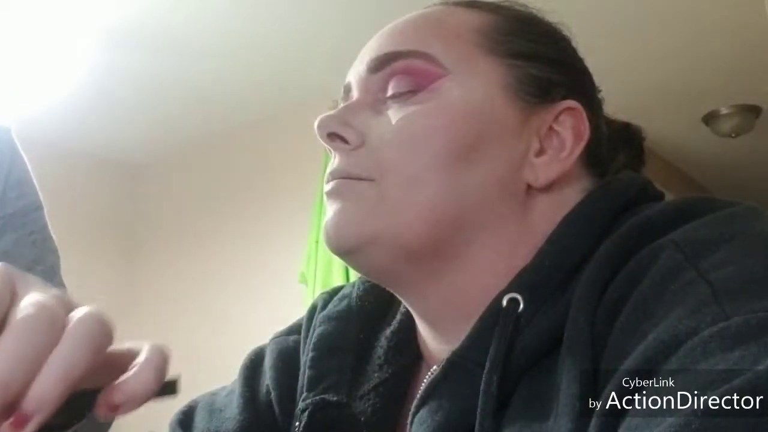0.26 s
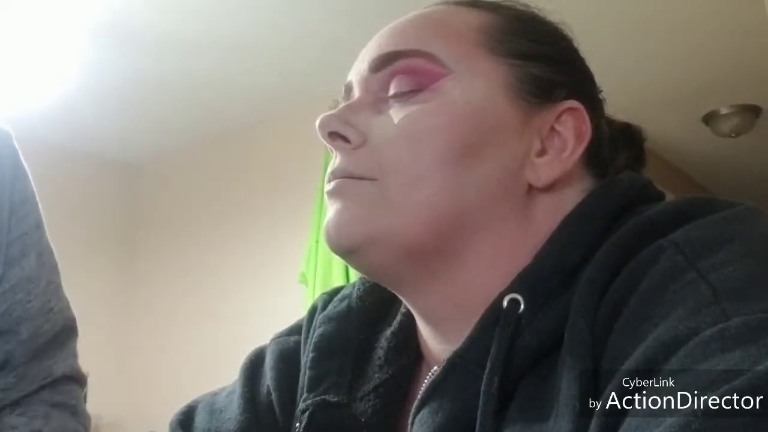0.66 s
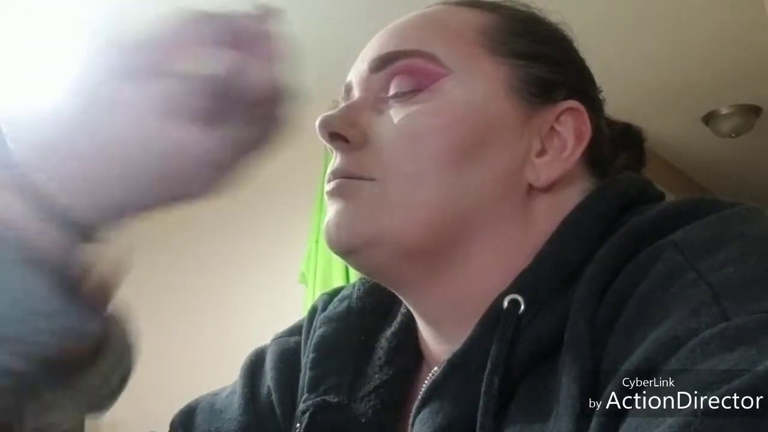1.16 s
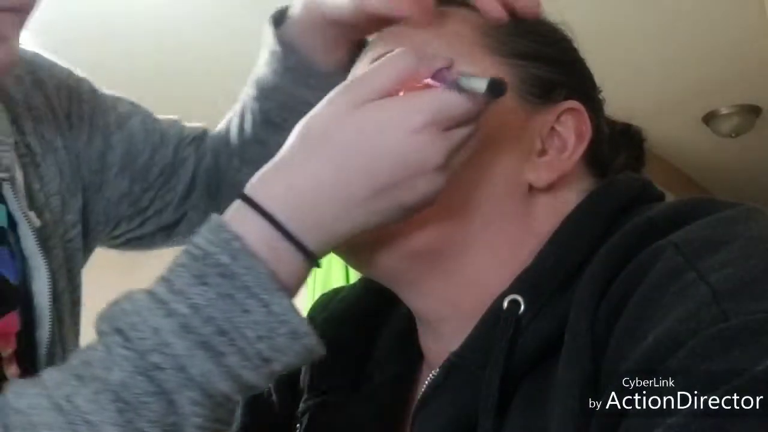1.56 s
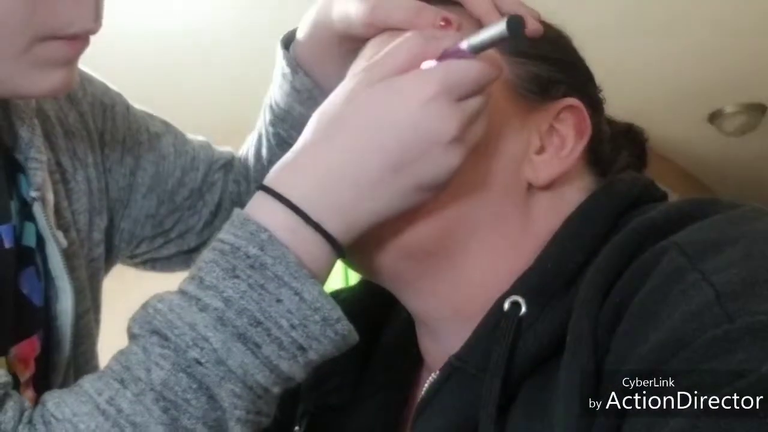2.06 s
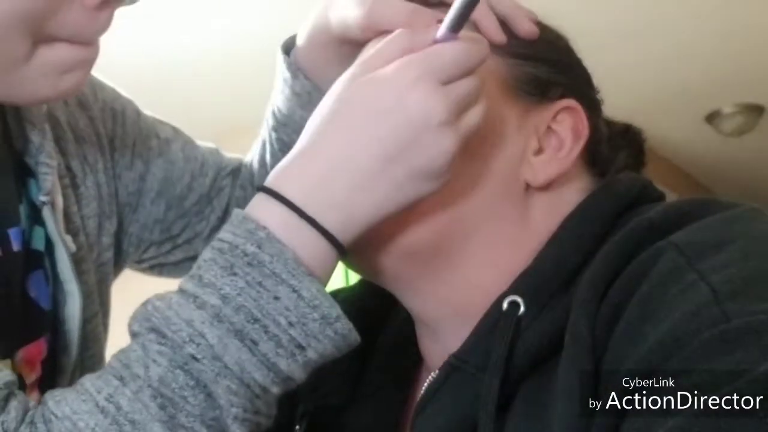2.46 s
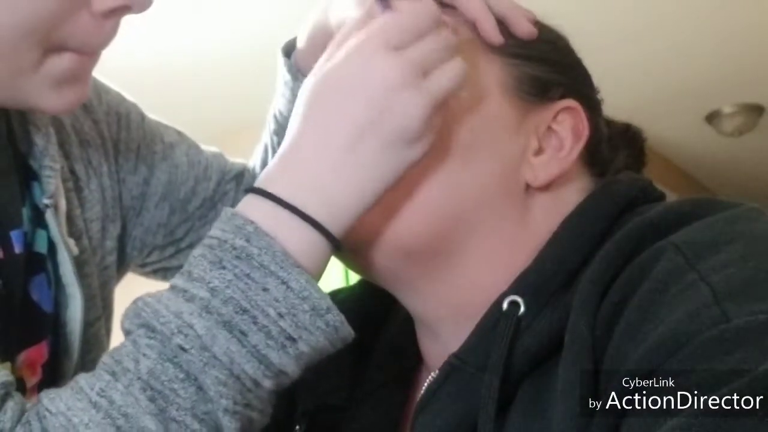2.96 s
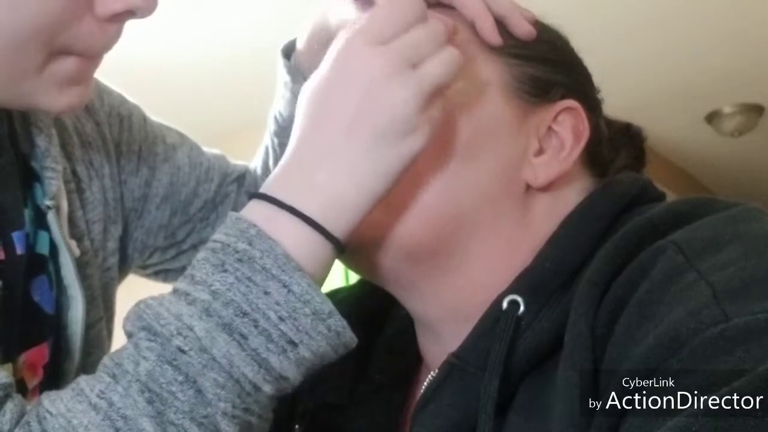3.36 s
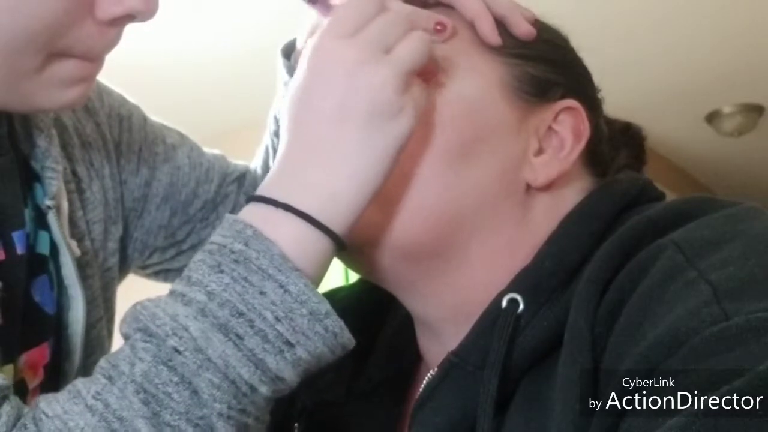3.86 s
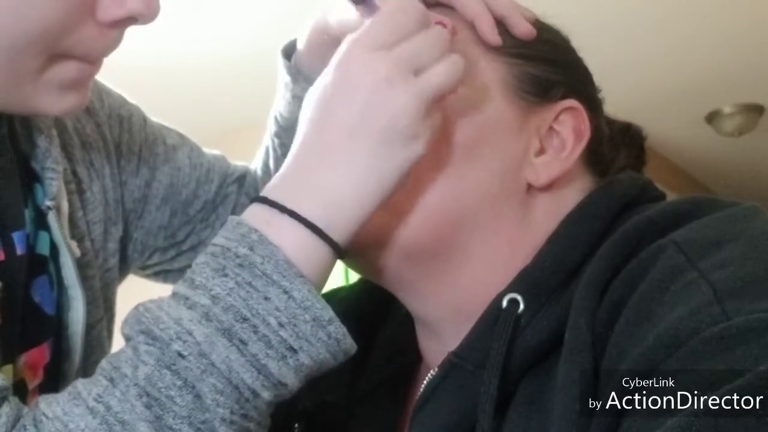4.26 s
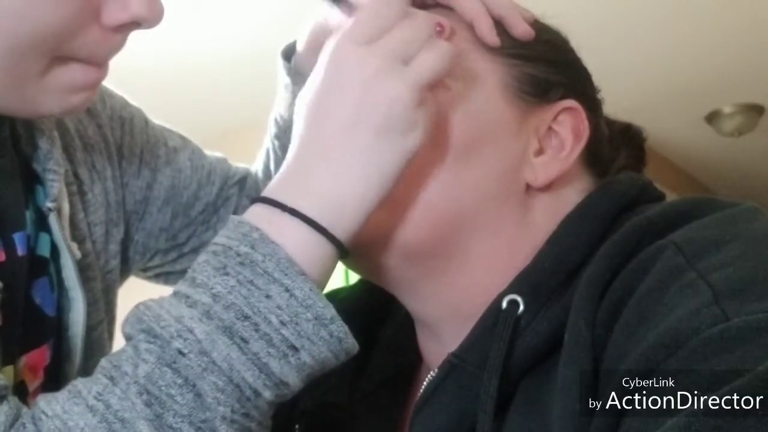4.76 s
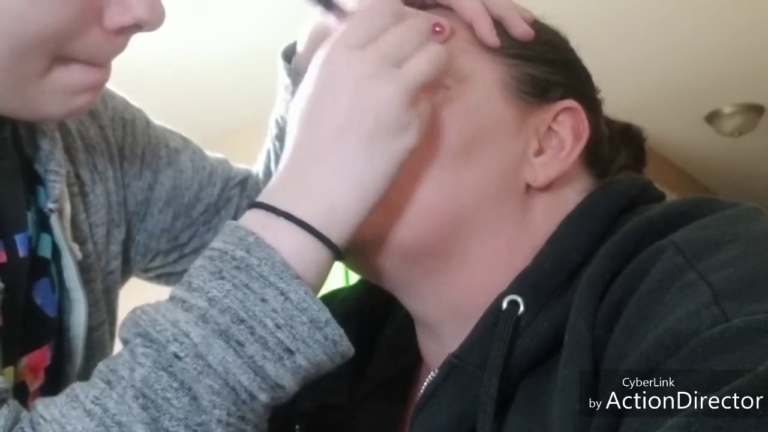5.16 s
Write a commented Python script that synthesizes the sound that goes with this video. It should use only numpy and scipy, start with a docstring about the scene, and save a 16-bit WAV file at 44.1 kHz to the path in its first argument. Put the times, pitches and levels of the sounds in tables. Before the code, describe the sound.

A dog laps water from a bowl across an echoing room, wet and quick, while a small plastic case clicks sharply close by.

```python
"""Echoing room in a house: a dog laps from its bowl across the room, about three laps a second.
Tongue smacks are cracks, hiss and droplets of filtered noise; splashes are swarms of rising sines in spray;
trapped air gulps as an unsteady sine with a gush of noise; tiny bubbles tick as falling sines.
Near the right port of a phone a small plastic case clicks on a table: noise and a blow through resonances.
The house adds hum tones, rumble and steady hiss."""
import sys
import numpy as np
from scipy import signal
from scipy.fft import rfft, irfft, next_fast_len
from scipy.io import wavfile
from scipy.ndimage import uniform_filter1d, map_coordinates

SR = 44100
rng = np.random.default_rng(int(sys.argv[2]) if len(sys.argv) > 2 else 0)


def transcribe(signal):
    """Save signal, clipped to [-1, 1], as a 16-bit WAV file at the path in sys.argv[1]."""
    frames = np.atleast_2d(signal).T
    limited = np.clip(frames, -1, 1)
    pcm = np.round(limited * 32767).astype(np.int16)
    wavfile.write(sys.argv[1], SR, pcm)


N = 238472

# tongue on water: t/s, level/dB, top treble/dB, lower resonance/dB, swell/s
TONGUE_SMACKS = [ (0.010, -40.5, 2.5, -0.5, 0.0036), (0.326, -29, 1.5, -7, 0.007),
                 (0.82, -29, -4, -16, 0.0038), (1.128, -37, 0, -8, 0.048), (1.226, -38, 1.5, 4, 0.0084),
                 (1.576, -40.5, -3, -1, 0.014), (1.600, -37.5, 0, -2, 0.0061), (1.818, -52, 9, 5, 0.0047),
                 (1.921, -42, 0, 3, 0.0079), (1.941, -36.5, 6.5, -12, 0.0091),
                 (2.021, -43.5, -23, -5, 0.0088), (2.329, -45.5, -1, 0, 0.0073), (2.366, -43, 4, 0, 0.0088),
                 (2.393, -36, 0.5, 0, 0.0056), (2.734, -43.5, 8.5, 3, 0.013), (3.172, -43, 7, -8, 0.0088),
                 (3.194, -36, 5.5, -3, 0.0043), (3.257, -51, 0, 6, 0.0098), (3.506, -48, 7, -8, 0.0069),
                 (3.53, -34.5, 5, -10, 0.0054), (3.619, -39.5, 1.5, 1.5, 0.0075),
                 (3.931, -49, -12, -8, 0.0059), (3.956, -42, -3, -19, 0.01), (3.977, -37, 9, 0, .012),
                 (4.306, -39.5, -1, -18, 0.0058), (4.333, -34.5, 8.5, -6, 0.0083), (4.4, -46, 9, -6, .008),
                 (4.778, -38, -4, -14, 0.0063), (4.805, -44, 8.5, 5, 0.0069), (4.886, -47, 10.5, 0, 0.0069),
                 (5.153, -33.5, 6, -3.5, 0.0089)]
# tiny bubbles bursting: t/s, level/dB, f/Hz, t60/s
BUBBLE_TICKS = [ (0.327, -39, 6700, 0.015), (0.823, -37.5, 6740, 0.016), (1.152, -47, 6770, .025),
                (1.229, -43, 6320, 0.032), (1.588, -40.5, 5000, .008), (2.023, -42, 6650, 0.033),
                (2.375, -36, 4630, 0.0097), (2.434, -38, 5240, 0.0099), (2.489, -21.5, 5130, 0.0029),
                (2.737, -43, 4930, 0.0056), (3.199, -35, 4690, 0.012), (3.53, -33.5, 6380, 0.026),
                (3.9345, -43.5, 4820, 0.015), (3.9936, -41, 5140, .008), (4.3415, -35, 6280, .01),
                (4.346, -38, 4730, .007), (4.335, -42, 10200, .008), (5.17, -42, 4170, .01),
                (5.154, -46, 10100, .008), (5.164, -43, 13500, .008), (4.784, -40.5, 6070, 0.024),
                (4.815, -46, 4620, 0.023), (5.16, -40, 4460, .01), (1.649, -44, 3660, .01),
                (1.662, -56, 2420, 0.0091), (0.0225, -42, 10100, .012), (0.334, -39, 10300, 0.013),
                (1.166, -44, 9500, .015), (1.6125, -49, 10100, .01), (1.946, -46, 10200, .01),
                (2.47, -46, 10300, 0.013), (2.748, -51, 10600, .01), (3.196, -37, 9700, 0.012),
                (3.196, -39, 6660, 0.011), (3.2005, -43, 10000, .008), (3.2635, -37.5, 9900, 0.025),
                (3.269, -41, 6540, 0.018), (3.609, -41, 10340, 0.015), (3.626, -35, 10100, 0.013),
                (3.96, -46, 6500, 0.017), (3.981, -47, 10100, 0.0087), (3.9935, -45, 10400, .008),
                (4.3415, -34, 12300, 0.0077), (4.8175, -40, 10000, 0.029), (5.163, -48, 9650, 0.0091)]
# bubble swarms: t/s, energy/dB, bubble f/Hz, pitch spread/octaves, spray/dB, length/s
BUBBLE_SPLASHES = [ (0.084, -24.5, 2080, 0.21, -14, .022), (0.43, -30, 3500, 0.37, -2, 0.019),
                   (1.156, -29.5, 2100, 0.1, 2.5, .018), (1.263, -25, 1560, 0.45, -11.5, 0.039),
                   (1.640, -29.5, 1810, 0.37, -5, 0.015), (1.691, -20.5, 1930, 0.25, -11.5, 0.022),
                   (1.987, -29, 1890, 0.14, -9, 0.019), (1.994, -37.5, 2920, 0.062, -19, .018),
                   (2.044, -31.5, 2500, .08, 1, 0.015), (2.483, -15.5, 4175, 0.087, -11, 0.014),
                   (2.807, -26.5, 4260, 0.53, -12, .025), (2.834, -31, 1390, 0.12, -17, 0.015),
                   (3.031, -38, 2460, 0.072, -24, 0.019), (3.272, -24.5, 4300, 0.29, -11, .02),
                   (3.277, -23.5, 1855, 0.26, -16, 0.031), (3.552, -31.5, 1330, 0.23, -16, 0.021),
                   (3.603, -25.5, 1980, 0.52, -11, 0.023), (3.626, -28, 1840, 0.37, -11, 0.017),
                   (3.828, -41.5, 2330, 0.12, -29, 0.012), (3.860, -38.5, 3510, 0.029, -23, 0.017),
                   (3.982, -35, 3260, 0.24, -14, 0.025), (4.072, -21.5, 4300, 0.24, -10.5, 0.014),
                   (4.42, -27, 2200, 0.5, -18, 0.03), (4.898, -21.5, 2060, 0.28, -21, .03),
                   (4.9, -30.5, 3600, 0.22, -23, .02), (5.194, -35, 3100, 0.052, -23, 0.017),
                   (5.249, -23.5, 2070, 0.35, -13, .03)]
# droplet spray spectrum: f/Hz, level per Hz/dB
SPRAY_COLOUR = [(300, 15), (1000, 9.5), (2000, 7.5), (4000, 9), (7000, 7.5), (12000, -2)]
# trapped air pockets: t/s, energy/dB, starting f/Hz
AIR_PLOPS = [ (0.0, -24.5, 705), (0.043, -22.5, 797), (0.384, -27.5, 743), (0.412, -27, 697),
             (0.848, -14, 827), (1.174, -24, 671), (1.201, -18, 729), (1.633, -22, 820),
             (1.706, -27.5, 958), (1.844, -31.5, 710), (1.898, -25.5, 970), (1.944, -27, 1130),
             (1.962, -26, 976), (1.995, -22, 720), (2.047, -27.5, 976), (2.329, -24.5, 846),
             (2.431, -17.5, 734), (2.488, -30, 975), (2.678, -30.5, 838), (2.752, -23.5, 768),
             (2.811, -28, 889), (2.833, -31, 1126), (3.297, -31.5, 1084), (3.552, -23, 795),
             (4.02, -21.5, 724), (4.055, -31, 790), (4.347, -32, 843), (4.362, -29.5, 692),
             (4.853, -26.5, 690), (5.185, -24.5, 654), (5.249, -30, 544)]
# bowl resonances: f/Hz, width/Hz, level/dB
BOWL_MODES = [(720, 31, 9), (846, 18, 8), (967, 12, 6), (1094, 5.1, 15)]
# case on table: t/s, energy/dB, table thump level/dB, top treble/dB, contact length/s,
# favoured ring f/Hz, its width/Hz, its level/dB, modes under 1.7 kHz/dB
CASE_CLICKS = [ (0.3462, -6, -47, 12.5, 0.0021, 12300, 2500, -4, -7),
               (0.6323, 7, -22, -9, 0.0033, 2580, 450, 1, 2),
               (0.7649, -3.5, -26, -19, 0.005, 2100, 350, 10, -8.5),
               (0.7718, -17, -52, -14, 0.0024, 4700, 400, 11, 0),
               (0.813, -23, -40.5, -9, 0.005, 2000, 200, -2, -1),
               (0.8849, -3.5, -59, 5, 0.004, 4450, 350, 3, -13.5),
               (0.8883, -6, -52, 1, 0.004, 4700, 400, 7, -1),
               (0.8922, -6.5, -33, -1, 0.006, 1310, 150, 6, -3)]
# plastic case resonances: f/Hz, width/Hz, level/dB
CASE_MODES = [(560, 55, 6), (820, 160, 9.5), (1337, 160, 13.5), (1610, 110, 9), (2200, 220, 9),
              (2690, 300, 2.5), (3800, 260, 2.5), (4450, 430, 7.5), (5140, 300, 11), (6500, 980, -5)]
# what the case sends to the walls over what it sends to the phone: f/Hz, level/dB
CASE_WALLWARD = [(300, 15), (600, 8), (1300, 1), (2000, -1), (2700, 3.5), (4400, -3), (5500, -4.5),
                 (6500, 3), (10000, -0.5)]
# table top modes: f/Hz, level/dB, t60/s
TABLE_MODES = [(177, 9, 0.041), (349, -4, 0.038), (460, 4, 0.021)]
# reverberation: f/Hz, t60/s
ROOM_T60 = [(300, 0.34), (1000, 0.37), (4000, 0.46), (10000, 0.36), (15000, 0.28)]
# left-right likeness of diffuse sound: f/Hz, correlation/1
PORT_LIKENESS = [(60, 0.98), (130, 0.95), (290, 0.82), (640, 0.14), (1400, 0.064), (15000, 0.0095)]
# background noise spectrum, relative: f/Hz, level per Hz/dB
AIR_COLOUR = [(25, 3), (55, 2), (76, 3), (100, -8.5), (150, -3.5), (200, -4), (260, -10.5), (404, -15),
              (575, -20.5), (1090, -23), (2100, -25.5), (2790, -32), (7000, -33.5), (9100, -83)]
# hum tones: f/Hz, level/dB, wavering/dB
HUM_TONES = [(52.2, -60.5, 1.5), (58.7, -57.5, 2.5), (120, -56.5, 0.4)]
# response common to both ports: f/Hz, level/dB
PHONE_COLOUR = [(20, -48), (33, -25), (40, -4), (48, -1), (3100, 3.5), (4300, 7), (5600, 3), (6600, 0.5),
                (7400, -9), (8300, -18.5), (9300, -2), (10300, 3.5), (13000, 2), (15000, -10)]
# left port minus right port: f/Hz, level/dB
PORT_DIFFERENCE = [(60, -1), (160, -2.5), (270, -3.5), (450, -6), (740, -3.5), (1220, -8.5), (2010, -6.5),
                   (3330, -9.5), (4500, -9.5), (5500, 3.5), (6600, 15.5), (9080, 7), (12000, 1.5),
                   (15000, 1.5)]

CRACK_DB = 1  # gain of the first crack
# stray ticks after a smack: highest level over it, centre pitch, full spread, time span
STRAY_DB, STRAY_HZ, STRAY_OCTAVES, STRAY_S = -11, 7000, 1.6, .08
PLOP_T60_S = 0.071
BLOW_DB = 14  # gain of the hard blow
MODE_BLUR = 3.5  # width factor: from all sides at once the case modes run together
EARLY_DB, EARLY_T60_S = -7.5, 0.037  # near walls and floor over the late tail
AIR_DB, TOP_HISS_DB = -49, -66
HUM_DRIFT_RAD = .4
TOP_HZ = 15900


def amp(db):
    """Amplitude factor of a level in dB."""
    return 10 ** (np.asarray(db) / 20)


def unit(x):
    """x scaled to rms 1."""
    return x / np.sqrt(np.mean(x ** 2) + 1e-20)


def energy(x, db):
    """x scaled to the given total energy."""
    return amp(db) * x / np.linalg.norm(x)


def along(points, f_hz):
    """(f/Hz, value) points interpolated on a log frequency axis."""
    point_hz, value = np.transpose(points)
    return np.interp(np.log(f_hz + 1), np.log(point_hz + 1), value)


def filtered(x, response):
    """x times a complex response of frequency."""
    n = x.shape[-1]
    padded = next_fast_len(n + 4096)
    f_hz = np.fft.rfftfreq(padded, 1 / SR)
    return irfft(rfft(x, padded) * response(f_hz), padded)[..., :n]


def peak(f_hz, centre_hz, width_hz):
    """Causal second-order resonance, gain 1 at its centre."""
    damping = 1j * f_hz * width_hz
    return damping / (centre_hz ** 2 - f_hz ** 2 + damping)


def treble(f_hz, top_db):
    """Shelf stepping between 7.5 and 9 kHz."""
    return amp(along([(7500, 0.0039), (9000, top_db)], f_hz))


def burst(t_s, length_s, rise_s):
    """Puff of noise: envelope and flat spectrum are imposed in turn."""
    fade = amp(-15 * (t_s / max(length_s, .001)) ** 2) * (1 - np.exp(-t_s / rise_s))
    even = rng.standard_normal(len(t_s))
    for _ in range(6):
        envelope = np.sqrt(np.abs(uniform_filter1d(even ** 2, size=24)) + 1e-20)
        z = rfft(even / envelope * fade)
        even = irfft(z / np.abs(z), len(t_s))
    even = even * np.sqrt(np.sqrt(fade))
    return even * np.linalg.norm(fade) / np.linalg.norm(even)


def smacks(t_s):
    """The flat of the tongue cracks on the surface, the water tears open with a hiss, droplets crackle after."""
    out = []
    for at_s, level_db, top_db, body_db, swell_s in TONGUE_SMACKS:
        sparse = rng.standard_normal(len(t_s)) * (rng.random(len(t_s)) < .02)
        drops = sparse * amp(3.5 - 60 * t_s / 0.3) * (1 - np.exp(-t_s / swell_s))
        tear = rng.standard_normal(len(t_s)) * 0.24 * t_s / swell_s * np.exp(-t_s / swell_s)
        crack = amp(CRACK_DB) * burst(t_s, 1.32 * swell_s, rise_s=2.3 * swell_s)

        def colour(f_hz):
            body = peak(f_hz, 7070, 3730) ** 2 + amp(body_db) * peak(f_hz, 4740, 3100) ** 2
            body = np.abs(body + 0.8 * peak(f_hz, 6440, 330))
            upper = 0.62 * np.abs(peak(f_hz, 8020, 800))
            top = 0.19 * np.abs(peak(f_hz, 15500, 4800)) ** 2
            return treble(f_hz, top_db) * (body + upper + top)

        out.append((at_s, amp(level_db) * filtered(crack + tear + drops, colour)))
    return out


def ticks(t_s, count=5):
    """A tiny bubble bursts at the surface: a decaying sine falling in pitch; stray ones follow every smack."""
    stray = []
    for smack_s, smack_db, *_ in TONGUE_SMACKS:
        for u, v, w in rng.random((count, 3)):
            pitch_hz = STRAY_HZ * 2 ** (STRAY_OCTAVES * (w - .5))
            stray.append((smack_s + STRAY_S * u, smack_db + STRAY_DB - 10 * v, pitch_hz, 0.011))
    out = []
    for at_s, level_db, pitch_hz, t60_s in BUBBLE_TICKS + stray:
        fade = amp(level_db - 60 * t_s / t60_s) * (1 - np.exp(-8 * t_s / t60_s))
        bent_s = t_s + 0.0002 * (1 - np.exp(-t_s / 0.0011))  # pitch starts high
        out.append((at_s, fade * np.sin(2 * np.pi * pitch_hz * bent_s)))
    return out


def splashes(t_s, count=36):
    """Small bubbles, each rising in pitch as it dies, in a puff of spray; the earliest are fainter."""
    out = []
    for at_s, energy_db, mean_hz, octaves, spray_db, length_s in BUBBLE_SPLASHES:
        start, size = rng.random((2, count, 1))
        age_s = np.clip(t_s - length_s * start, 0, None)
        share = (np.arange(count)[:, None] + rng.random((count, 1))) / count
        crowded = np.log(share / (1 - share + 1e-3) + 1e-3)  # pitches crowd round the middle
        pitch_hz = mean_hz * 2 ** (octaves / 2 * crowded)
        # bubbles of like size ring on together for more cycles
        life_s = 5.74 / (2.7 * np.abs(octaves) + 0.21) / pitch_hz
        growth = np.clip(start / 0.1, .1, 1)
        fade = growth * amp(-11 * size - 30 * age_s / life_s) * (1 - np.exp(-age_s / 0.0012))
        cycles = pitch_hz * age_s * (1 + 0.043 * age_s / life_s)
        bubbles = fade * np.sin(2 * np.pi * cycles)
        landings = 1. * (rng.random(len(t_s)) < .006)  # droplets land one by one
        patter = unit(0.38 + uniform_filter1d(landings, size=30) * 30)
        puff = burst(t_s, 0.8 * length_s, rise_s=0.71 * length_s) * patter
        spray = amp(spray_db) * filtered(puff, lambda f_hz: amp(along(SPRAY_COLOUR, f_hz)))
        out.append((at_s, energy(bubbles.sum(0) + spray, energy_db)))
    return out


def plops(t_s):
    """The curled tongue traps a large, unsteady bubble with a gush of air; both sound through the bowl."""
    def bowl(f_hz):
        return 1 + sum(amp(db) * peak(f_hz, mode_hz, width_hz) for mode_hz, width_hz, db in BOWL_MODES)

    out = []
    for at_s, energy_db, pitch_hz in AIR_PLOPS:
        shake_rad = np.cumsum(rng.standard_normal(len(t_s))) * 0.13  # the bubble wall shivers
        bubble = np.sin(2 * np.pi * pitch_hz * t_s * (1 + 1.56 * t_s) + shake_rad)
        noise = rng.standard_normal(len(t_s))
        gush = 3.6 * filtered(noise, lambda f_hz: peak(f_hz, pitch_hz, 295) ** 2)
        fade = amp(-60 * t_s / PLOP_T60_S) * (1 - np.exp(-t_s / 0.0073))
        out.append((at_s, energy(filtered(fade * (bubble + gush), bowl), energy_db)))
    return out


def clicks(t_s):
    """One hard blow and a brief rattle ring the case; the walls get its modes blurred."""
    out = []
    for at_s, energy_db, _, top_db, length_s, ring_hz, ring_width_hz, ring_db, low_db in CASE_CLICKS:
        def shell(f_hz, blur=1):
            modes = 0
            for k, (mode_hz, width_hz, mode_db) in enumerate(CASE_MODES):
                gain = amp(mode_db + low_db * (k < 4))  # first four lie under 1.7 kHz
                modes = modes + gain * peak(f_hz, mode_hz, blur * width_hz)
            ring = amp(ring_db) * peak(f_hz, ring_hz, ring_width_hz)
            return modes + ring + 1.13 * (treble(f_hz, top_db) - 0.7)

        rattle = burst(t_s, length_s, rise_s=0.00066)
        blow = amp(BLOW_DB) * (np.arange(len(t_s)) == round(.0013 * SR))
        z = rfft(rattle + blow)
        z = z / np.sqrt(uniform_filter1d(np.abs(z) ** 2, size=50))  # drives all modes evenly
        contact = irfft(z, len(t_s)) * (t_s < 2 * length_s)
        direct = energy(filtered(contact, shell), energy_db)
        scattered = filtered(contact, lambda f_hz: np.abs(shell(f_hz, MODE_BLUR)))
        out.append((at_s, direct, scattered))
    return out


def thumps(t_s):
    """Each blow also pushes the table top, whose modes ring as decaying sines."""
    modes = sum(amp(db - 60 * t_s / t60_s) * np.sin(2 * np.pi * mode_hz * t_s)
                for mode_hz, db, t60_s in TABLE_MODES)
    thump = modes * (1 - np.exp(-t_s / 0.0036))
    return [(at_s, amp(thump_db) * thump) for at_s, _, thump_db, *_ in CASE_CLICKS]


def heard(events, room_db, left_db, lags_s, gap_s, colour=((1, 0),)):
    """Each (t/s, sound[, sound for the walls]) arrives direct at each port's lag, then as diffuse room tail."""
    out = np.zeros((2, N + 2 * SR))
    for at_s, sound, *scattered in events:
        f_hz, t_s, z = signal.stft(rng.standard_normal((2, SR // 2)), SR, nperseg=256)
        alike = np.clip(along(PORT_LIKENESS, f_hz), 0, 1)[:, None]  # long waves reach both ports alike
        z[1] = alike * z[0] + np.sqrt(1 - alike ** 2) * z[1]
        late = amp(-60 * t_s / along(ROOM_T60, f_hz)[:, None])
        early = amp(EARLY_DB - 60 * t_s / EARLY_T60_S)
        tail = signal.istft(z * (late + early), SR, nperseg=256)[1]
        # first walls answer after a gap
        tail = tail * np.clip(np.arange(tail.shape[1]) / SR / gap_s - 1, 0, 1)
        to_walls = scattered[0] if scattered else sound
        wet = signal.fftconvolve(to_walls[None], tail, axes=1)
        wet = filtered(wet, lambda f_hz: amp(along(colour, f_hz)))
        out[:, round(at_s * SR):][:, :wet.shape[1]] += energy(wet, room_db) * np.linalg.norm(sound)
        for port, lag_s, port_db in zip(out, lags_s, (left_db, 0)):
            port[round((at_s + lag_s) * SR):][:len(sound)] += amp(port_db) * sound
    return out[:, :N]


def house():
    """Rumble alike at both ports, hiss unrelated, and wavering hum tones."""
    def mid_side(f_hz):
        turn_rad = np.arccos(np.clip(along(PORT_LIKENESS, f_hz), -1, 1)) / 2
        return amp(along(AIR_COLOUR, f_hz)) * [np.cos(turn_rad), np.sin(turn_rad)]

    def waver():
        return map_coordinates(rng.standard_normal(60), [3 * t_s])  # three random points a second

    t_s = np.arange(N) / SR
    mid, side = filtered(rng.standard_normal((2, N)), mid_side)
    air = amp(AIR_DB) * unit(np.array([mid + side, mid - side]))
    hiss = filtered(rng.standard_normal((2, N)), lambda f_hz: amp(along([(5000, -1), (7000, 1.5)], f_hz)))
    hum = 0
    for tone_hz, level_db, waver_db in HUM_TONES:
        level = np.sqrt(2) * amp(level_db + waver_db * waver())
        hum = hum + level * np.sin(2 * np.pi * tone_hz * t_s + HUM_DRIFT_RAD * waver())
    return air + amp(TOP_HISS_DB) * hiss + hum


def scene():
    """Splash and gulp sound inside the bowl, out of direct view; the smack above its rim is drier."""
    t_s = np.arange(SR // 6) / SR
    bowl_lags_s, case_lags_s = (0, .00036), (.0003, 0)  # left, right
    tongue = heard(smacks(t_s), room_db=5.0, left_db=3.0, lags_s=bowl_lags_s, gap_s=0.00085)
    pops = heard(ticks(t_s), room_db=4.5, left_db=4.5, lags_s=bowl_lags_s, gap_s=0.002)
    water = heard(splashes(t_s), room_db=10.5, left_db=3.5, lags_s=bowl_lags_s, gap_s=0.0022)
    gulps = heard(plops(t_s), room_db=5.5, left_db=1.0, lags_s=bowl_lags_s, gap_s=0.0064)
    case = heard(clicks(t_s), room_db=-5.5, left_db=-9.0, lags_s=case_lags_s, gap_s=0.00037,
                 colour=CASE_WALLWARD)
    table = heard(thumps(t_s), room_db=-7.0, left_db=-2, lags_s=case_lags_s, gap_s=0.0032)
    return tongue + pops + water + gulps + case + table + house()


def record(dry):
    """Each port has its own colour, loud peaks are rounded off, nothing is kept above the band limit."""
    def port_colour(f_hz):
        halves = np.array([[.5], [-.5]])  # left, right
        return amp(along(PHONE_COLOUR, f_hz) + halves * along(PORT_DIFFERENCE, f_hz))

    ports = filtered(dry, port_colour)
    rounded = ports / (1 + np.abs(ports / .95) ** 6) ** (1 / 6)
    return filtered(rounded, lambda f_hz: f_hz < TOP_HZ)


dry = scene()
out = record(dry)
transcribe(out)
```